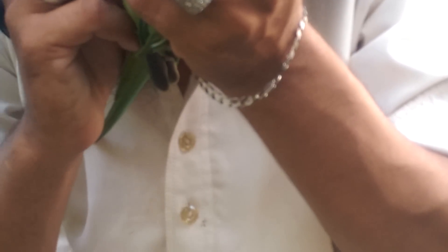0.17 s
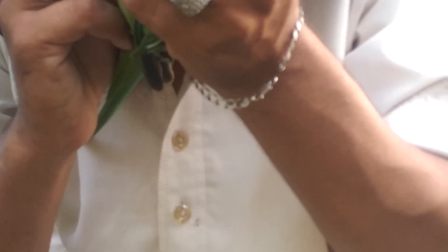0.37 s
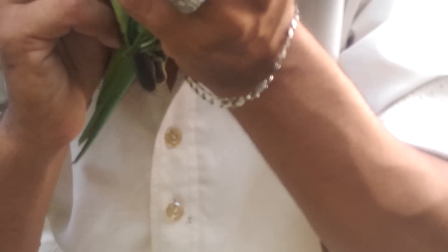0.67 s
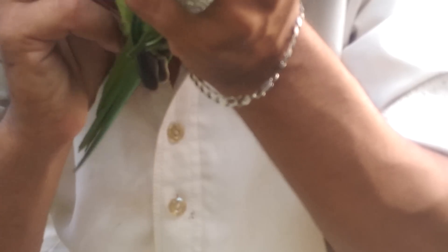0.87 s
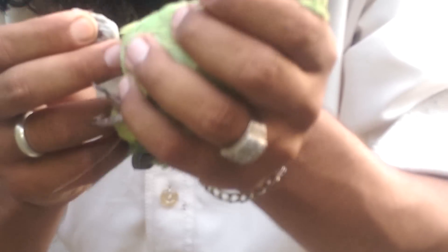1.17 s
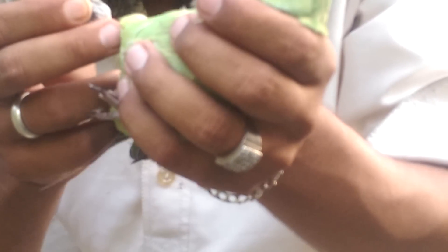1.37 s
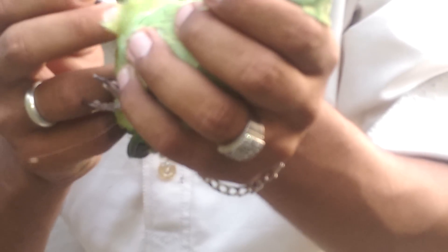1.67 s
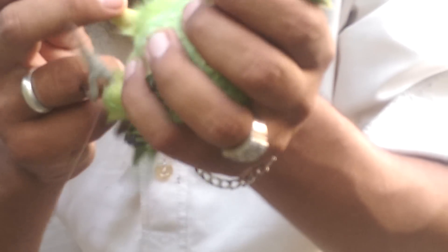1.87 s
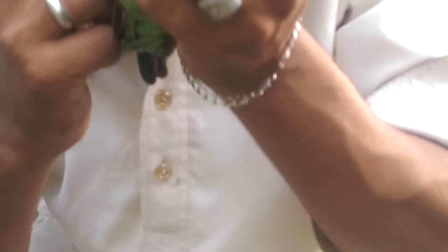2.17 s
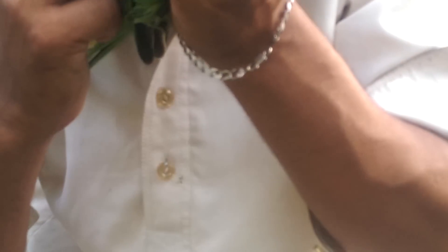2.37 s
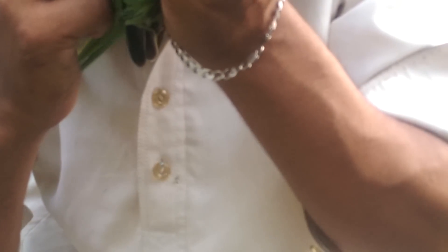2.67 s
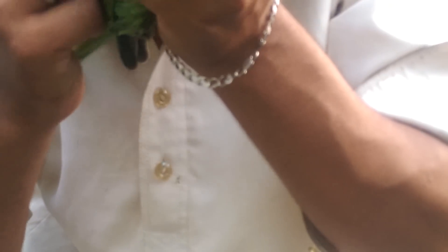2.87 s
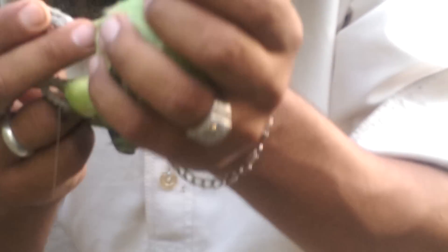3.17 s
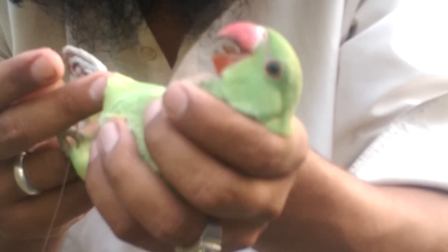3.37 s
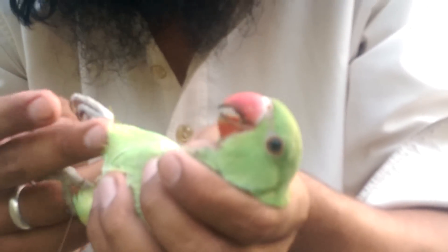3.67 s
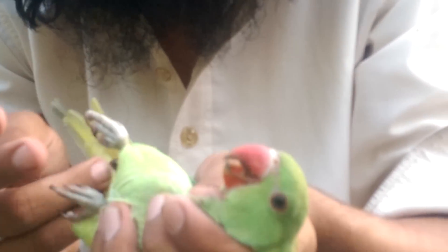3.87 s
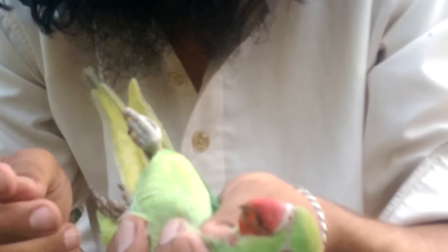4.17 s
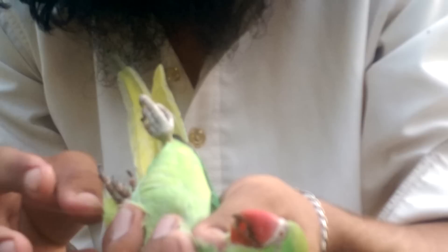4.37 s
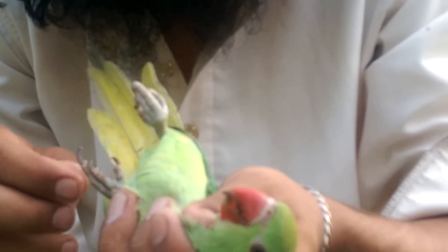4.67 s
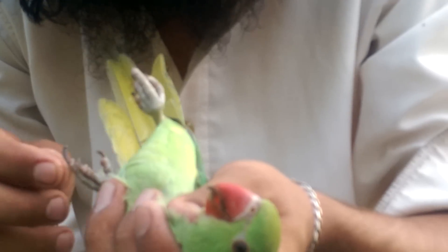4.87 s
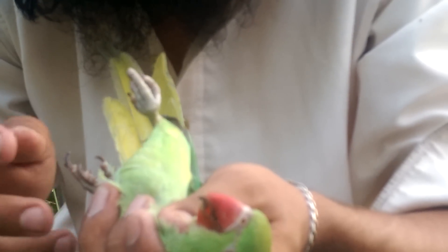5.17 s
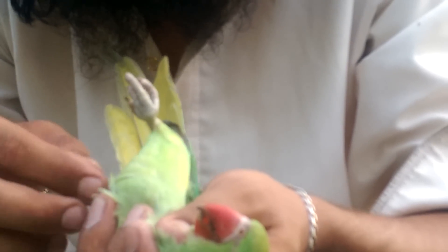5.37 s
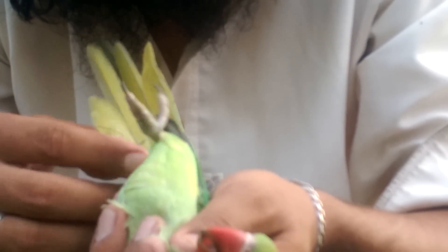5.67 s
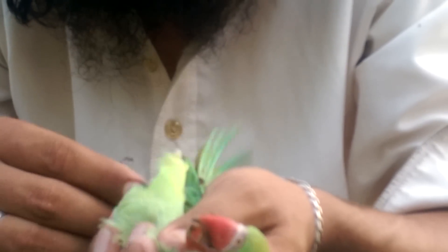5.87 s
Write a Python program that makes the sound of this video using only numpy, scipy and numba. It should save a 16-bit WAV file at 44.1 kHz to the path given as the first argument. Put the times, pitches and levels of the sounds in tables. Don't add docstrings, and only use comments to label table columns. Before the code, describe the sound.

Outdoors, close stereo phone pickup. A parakeet gives a run of loud, rough, nasal screeches with a fast rattling flutter and sharp starts and stops, drawing small hissy gasps between them. It falls silent for over two seconds, leaving steady airy hush, a low rumble, high cricket shimmer and tiny distant bird notes. Feathers brush fingers once, then a final bright squawk rises and runs into the end.

```python
import sys
import numpy as np
from scipy import signal
from scipy.fft import rfft, irfft
from scipy.io import wavfile
from scipy.ndimage import uniform_filter1d, map_coordinates
from numba import njit

SR = 44100
rng = np.random.default_rng(int(sys.argv[2]) if len(sys.argv) > 2 else 0)


def generate_wav(signal):
    frames = np.transpose(np.atleast_2d(signal))
    scaled = np.clip(frames, -1, 1) * 32767
    pcm = np.round(scaled).astype(np.int16)
    wavfile.write(sys.argv[1], SR, pcm)


def linear_from_db(decibels):
    return 10 ** (np.asarray(decibels, float) / 20)


N = 265570
TIME = np.arange(N) / SR


def unit(x):
    return x / np.sqrt(np.mean(x ** 2))


def curves(table):
    columns = np.array(table).T
    return [np.interp(TIME, columns[0], column) for column in columns[1:]]


def walk(rate):
    hold = int(SR / rate)
    steps = np.repeat(rng.standard_normal(N // hold + 1), hold)
    return 1.3 * uniform_filter1d(uniform_filter1d(steps, hold), hold)[:N]


@njit
def svf(x, hz, width):
    y, band, low = np.empty(len(x)), 0., 0.
    for i in range(len(x)):
        g, k = np.tan(np.pi * hz[i] / SR), width / hz[i]
        v = (band + g * (x[i] - low)) / (1 + g * (g + k))
        band, low, y[i] = 2 * v - band, low + 2 * g * v, k * v
    return y


def ring(x, hz, width, second_width):
    centre = hz * np.ones(N)
    return svf(svf(x, centre, 1. * width), centre, 1. * second_width)


def coloured(points, likeness=None):
    log_hz = np.log(np.fft.rfftfreq(N, 1 / SR) + 1)

    def read(table):
        hz, value = np.array(table).T
        return np.interp(log_hz, np.log(hz), value)

    alike = np.clip(read(likeness), -.99, .99) if likeness else 0.5
    mid, side = rfft(rng.standard_normal((2, N))) * linear_from_db(read(points))
    side = side * np.sqrt((1 - alike) / (1 + alike))
    return irfft(np.array([mid + side, mid - side]), N)


def glide(s, length, start_hz, end_hz, db):
    u = np.clip((TIME - s) / length, 0, 1)
    cycles = length * u * (start_hz + (end_hz - start_hz) * u / 2)
    return linear_from_db(db) * np.sin(np.pi * u) * np.sin(2 * np.pi * cycles)


@njit
def beats(hz, stretch, size, weak, restart):
    out, phase, strong = np.zeros(len(hz) + 1), 0., True
    for i in range(len(hz)):
        step = 2 * hz[i] * (1 + stretch[i]) / SR
        phase += step
        if restart[i]:
            phase, strong = 1., True
        if phase >= 1:
            phase -= 1
            a = size[i] * (1. if strong else weak[i])
            out[i] += a * phase / step
            out[i + 1] += a * (1 - phase / step)
            strong = not strong
    return out[:-1]


def airway(choke, count):
    count = count + .022 * walk(90)
    burst = np.floor(count).astype(int)
    phase = count - burst
    chance = rng.standard_normal((600, 3))[burst % 600].T
    open_share = (.32 + .8 * (1 - choke)) * linear_from_db(.7 * chance[0])
    shut = 1 / (1 + np.exp(-(phase - np.minimum(open_share, .8)) / .11))
    depth = np.clip(choke + 2 * choke * (1 - choke) ** 1.3 * chance[1], 0, .98)
    burst_db = 1.4 * choke * chance[2]
    flow = uniform_filter1d((1 - depth * shut) * linear_from_db(burst_db), size=9)
    flow = flow / np.sqrt(uniform_filter1d(flow ** 2, size=2600))
    reopened = np.r_[False, np.diff(burst) > 0] & (depth > .6)
    detune, narrowing = .1 * chance[1], choke ** 3 * (phase - .2)
    return flow, reopened, detune, narrowing


# t/s, extra path/s, share
ECHO = [(.1, 0.00051, 0.27), (.7, 0.0034, 0.047), (.9, 0.00085, 0.21), (1.45, 0.0016, 0.19),
        (2.1, 0.0011, 0.13), (2.55, 0.0017, 0.043), (2.9, .001, 0.17), (3.25, 0.0015, 0.29),
        (3.381, 0.0016, 0.37), (5.831, 0.0014, .2)]


def chest(x):
    lag, share = curves(ECHO)
    dull = signal.sosfilt(signal.butter(2, 7500, fs=SR, output="sos"), x)
    return x + share * map_coordinates(dull, [np.arange(N) - lag * SR], order=3)


# t/s, windpipe pitch f/Hz, choke 0-1, airway closures per s
SYRINX = [(.1, 980, .95, 94), (.17, 930, .75, 90), (.24, 860, .68, 80), (.34, 810, .35, 72),
          (.38, 835, .78, 101), (.52, 860, .84, 99), (.57, 960, .94, 97.5), (.7, 960, .94, 99),
          (.9, 975, .95, 92), (1.08, 990, .95, 99.5), (1.2, 1090, .93, 110.3), (1.44, 1070, .93, 107),
          (1.6, 1040, .96, 90.5), (1.83, 1095, .94, 100), (1.91, 1170, .86, 110), (2.09, 1090, .9, 112),
          (2.25, 1030, .94, 97), (2.36, 1040, .92, 91.5), (2.5, 1000, .87, 76.5), (2.55, 980, .85, 105),
          (2.9, 975, .96, 97.5), (3.1, 955, .9, 104.5), (3.23, 1020, .84, 102.5), (3.33, 1030, .82, 94),
          (3.36, 1000, .55, 96), (5.875, 1070, .97, 118.5), (5.9, 1080, .62, 120), (6.03, 1050, .62, 121.5)]


def syrinx(call, onset, rough, slack):
    pipe_hz, choke, closures = curves(SYRINX)
    weak = .1 + .45 * np.clip((1090 - pipe_hz) / 280, 0, 1) ** 1.5
    hz = pipe_hz * (1 - .55 * np.clip(slack, 0, 1))
    counted = np.cumsum(closures) / SR
    count = counted - np.interp(onset, TIME, counted) + 100 * call
    flow, reopened, detune, narrowing = airway(choke, count)
    wobble = rough * (detune + .46 * choke * walk(1500))
    wobble = wobble - .15 * narrowing - .055 * np.clip(8 * choke - 6.6, 0, 1)
    size = linear_from_db(2.7 * rng.standard_normal(N) * rough * 3)
    pulses = beats(hz, wobble, size, weak, reopened)
    breath = .45 * rough * rng.standard_normal(N)
    return (unit(pulses - pulses.mean()) + breath) * flow, pipe_hz, hz


# f/windpipe pitch, width/Hz, left/dB, right/dB
PIPE = [(.67, 170, -5.5, -10.5), (1.02, 150, 2.5, -6), (1.62, 332, 3, -2.5), (1.96, 337, 0, -6.5)]
# f/Hz, width/Hz, left/dB, right/dB
THROAT = [(2686, 208, 2.5, -6.5), (3048, 293, 5, -34.5), (3577, 1120, 1.5, -12)]
# f/beak resonance, width/Hz, left/dB, right/dB
BEAK = [(.97, 500, 7, -4), (1.14, 500, 2.5, -4.5), (1.29, 700, -4.5, -25)]
# f/Hz, width/Hz, left/dB, right/dB
TOP = [(8185, 980, 5, -1.5), (9470, 1100, -1.5, -27.5), (10360, 490, 4.5, -0.5), (11770, 3100, -10.5, -28),
       (15000, 1800, -16.5, -17)]
# f/Hz, width/Hz, left/dB, right/dB
HEAD = [(682.6, 47, -5, -8), (1123, 150, -21.5, -16), (2285, 220, 2.5, -6.5), (440, 147, -13, -19)]
HEAD_DB = (-8, -6, -6.5, -9.5, -7, -16)
SHEEN_DB = (1, -2, -6, 5.5, 5, -9.5)
# side tone/dB, low throat/dB, whole throat/dB, beak rim/dB, top/dB
POSTURE = [(-9, 10, -1, -2, -9), (5, 4.5, 0, 2, -8.5), (6.5, 0.5, 2, 2.5, -9), (1, 5.5, 3.5, 14.5, -7),
           (2.2, 5, 5.5, 0.5, -9.5), (4, -1, 8, 13, -1.5)]
# lag/s of windpipe, throat, beak, top, head
PORT_LAG_S = (0.00018, 0.00024, 0.000316, 0.0002486, 0.00011)
LAG_SCALE = (0.865, 1.036, 0.998, 1.01, 1.005, 0.91)


def resonances(source, call, pipe_hz, beak_hz, gape_db):
    side_db, low_db, throat_db, rim_db, top_db = np.array(POSTURE)[call].T
    sheen_db, head_db = np.array(SHEEN_DB)[call], np.array(HEAD_DB)[call]
    lag_scale = np.array(LAG_SCALE)[call]
    drift = .000012 * (walk(13) + walk(300))
    # modes, their scale, group dB, which mode the hand shades, by how many dB
    groups = ((PIPE, pipe_hz, 0, 2, side_db),
              (THROAT, 1, throat_db + .4 * gape_db, 0, low_db),
              (BEAK, beak_hz, gape_db, 2, rim_db),
              (TOP, 1, top_db + gape_db, 4, sheen_db),
              (HEAD, 1, head_db, 0, 0))
    out = np.zeros((2, N))
    for (modes, scale, band_db, shaded, shade_db), lag in zip(groups, PORT_LAG_S):
        band = np.zeros((2, N))
        for k, (f, width, left_db, right_db) in enumerate(modes):
            mode = ring(source, f * scale, 1.03 * width, 3. * width) * linear_from_db(shade_db * (k == shaded))
            band += (-1) ** k * linear_from_db([[left_db], [right_db]]) * mode
        place = np.arange(N) - (lag * lag_scale + drift) * SR
        band[1] = map_coordinates(band[1], [place], order=3)
        out += band / np.std(band) * linear_from_db(band_db)
    return out


# onset t/s, end t/s, beak resonance at onset f/Hz, at end f/Hz, roughness 0-1
SCREECHES = [(.0978, .698, 4850, 4830, .24), (.8975, 1.438, 4330, 4330, .18),
             (1.6057, 2.088, 4230, 4680, .17), (2.2449, 2.548, 4090, 4120, .19),
             (2.8991, 3.366, 4850, 4700, .3), (5.8382, 6.06, 4300, 4450, .37)]
# t/s, level/dB, gape/dB
EFFORT = [(.1, -32.5, -10), (.15, -33.5, -0.5), (.318, -33.5, -7.5), (.678, -29, 3.5), (.7, -32.5, 1),
          (.9, -34, 0.5), (1.044, -33.5, 3), (1.108, -28.5, 9.5), (1.17, -30, 9.5), (1.402, -29.5, 9.5),
          (1.436, -31, 11), (1.61, -28.5, 8), (1.676, -30.5, 9), (1.834, -32.5, 11), (1.904, -27, 6),
          (2.06, -30.5, 10), (2.086, -31, 14), (2.25, -29.5, 1), (2.366, -26, 1.5), (2.53, -29.5, -2),
          (2.55, -32.5, -7.5), (2.9, -38.5, -3.5), (2.94, -32.5, -0.5), (3.052, -29, 0.5),
          (3.166, -29, 2.5), (3.266, -29, 6), (3.36, -29, 6), (5.849, -31, 8), (5.857, -23, -3),
          (5.946, -31.5, 5.5)]


def parakeet():
    db, gape_db = curves(EFFORT)
    screeches = np.array(SCREECHES)
    call = np.clip(np.searchsorted(screeches[:, 0] - .05, TIME) - 1, 0, None)
    onset, end, first_hz, last_hz, rough = screeches[call].T
    db = db - 4502.5 * np.maximum(onset - TIME, 0) - 1498 * np.maximum(TIME - end, 0)
    db = db - 4.5 * np.exp(-np.maximum(TIME - onset, 0) / .018)
    beak_hz = first_hz + (last_hz - first_hz) * np.clip((TIME - onset) / (end - onset), 0, 1)
    slack_s = 0.0073
    slack = np.exp(-np.abs(TIME - onset) / slack_s)
    slack = slack + .8 * np.exp(-np.maximum(end - TIME, 0) / slack_s)
    source, pipe_hz, hz = syrinx(call, onset, rough, slack)
    out = resonances(-chest(source), call, pipe_hz, beak_hz, gape_db - 11.5 * slack)
    out = out + linear_from_db(-4.5) * slack ** 2 * np.sin(2 * np.pi * np.cumsum(hz) / SR)
    pan_db = 1.4 + slack
    return out * linear_from_db(db) * linear_from_db(np.array([pan_db - 5, 5 - pan_db]) / 2)


def room(x):
    t, t60_s = np.arange(int(.35 * SR)) / SR, .27
    tail = rng.standard_normal((2, len(t))) * linear_from_db(-60 * t / t60_s) * (t > .003)
    tail = tail / np.sqrt(np.sum(tail[0] ** 2))
    return linear_from_db(-23) * signal.fftconvolve(x, tail, axes=1)[:, :N]


# t/s, length/s, level/dB
GASPS = [
    (1.45, 0.45, -53.5),
    (2.099, 0.13, -57.5),
]


def gasps():
    swell = sum(linear_from_db(db) * np.sin(np.pi * np.clip((TIME - s) / length, 0, 1)) for s, length, db in GASPS)
    hiss = ring(rng.standard_normal(N), 3230, 7600, 7600)
    return swell * unit(hiss) * linear_from_db(np.array([[2.5], [-2.5]]) + 3.4 * walk(84))


# f/Hz, level/dB per Hz
RUSTLE_TONE = [(180, -39), (300, -2.5), (348, -16), (502, -5), (645, -14), (1170, -7.5), (2250, -13),
               (7570, -16.5), (16000, -27)]


def rustle():
    start_s, hold_s, fade_db_per_s = 3.794, .05, 125
    fade_db = fade_db_per_s * np.maximum(TIME - start_s - hold_s, 0)
    return unit(coloured(RUSTLE_TONE)) * (TIME > start_s) * linear_from_db(-49.5 - fade_db + 1.2 * walk(120))


def phrases(table, hz, length, fall):
    gap_s = .027
    return sum(glide(s + k * gap_s, length, (1 + fall) * hz, (1 - fall) * hz, db)
               for s, db, notes in table for k in range(round(notes)))


# t/s, peak level/dB, notes
CHIRPS = [(.0044, -50, 3), (2.5944, -53, 1), (2.8064, -55, 3), (3.709, -54, 3), (3.9414, -53.5, 3),
          (4.6229, -51.5, 3), (4.8837, -52, 2), (5.463, -52, 3)]
# t/s, peak level/dB, notes
TWITTER = [(3.5144, -59, 2), (3.6197, -58, 1), (4.1465, -58.5, 3), (4.6089, -55.5, 1), (4.6894, -59.5, 3),
           (5.274, -56, 1), (5.3228, -56, 1), (5.8155, -55, 1)]
# t/s, length/s, start f/Hz, end f/Hz, level/dB
HOOTS = [
    (1.75, .04, 270, 255, -53),
    (1.945, .06, 310, 240, -49),
    (3.855, .065, 285, 240, -47.5),
    (1.548, .025, 1050, 1000, -45),
    (2.13, .075, 2000, 2450, -44),
    (2.145, .055, 2350, 2100, -44),
    (2.212, .022, 1000, 1300, -47),
    (3.79, .03, 480, 470, -49),
    (3.572, .012, 4200, 3600, -55),
    (2.882, .005, 2400, 1600, -47),
]


def far_birds():
    notes = phrases(CHIRPS, 5480, 0.0111, 0.113) + phrases(TWITTER, 6240, 0.01, 0.035)
    notes = notes + linear_from_db(2.5 * walk(200)) * sum(glide(*row) for row in HOOTS)
    return np.array([np.roll(notes, shift=8), notes])


# f/Hz, width/Hz, level/dB, throb/dB
CRICKETS = [(7610, 860, -60.5, 0), (8000, 300, -72.5, 0.5), (9250, 596, -75, -2), (4600, 500, -72.5, 1),
            (5700, 750, -69, 4)]


def crickets():
    out = np.zeros((2, N))
    for hz, width, db, throb_db in CRICKETS:
        throb = linear_from_db(db + throb_db * np.tanh(walk(45)) + 1.1 * walk(2.7))
        for side in out:
            side += throb * unit(ring(rng.standard_normal(N), hz, 0.98 * width, 0.98 * width))
    return out


# f/Hz, level/dB per Hz
AIR = [(12, -47), (20, 1), (88, -9), (134, -4.5), (446, -20), (698, -20.5), (1440, -25), (1710, -20.5),
       (3630, -31), (5680, -27.5), (6540, -39.5), (7730, -22), (10200, -37), (14300, -38), (16000, -50)]
# f/Hz, left-right likeness
LIKENESS = [(60, .93), (130, .86), (290, .85), (640, .2), (1410, -.5), (3100, -.13), (6820, -.21),
            (15000, -.31)]


def open_air():
    return unit(coloured(AIR, LIKENESS)) * linear_from_db(-59 + .7 * walk(3))


def rumble():
    drone = svf(rng.standard_normal(N), 60.5 * np.ones(N), 26.)
    return linear_from_db(-62.5 + 0.68 * walk(1.8)) * unit(drone)


def scene():
    bird = parakeet()
    near = bird + room(bird) + gasps() + rustle()
    return near + far_birds() + crickets() + open_air() + rumble()


def band_limit(x):
    return signal.sosfilt(signal.butter(12, 16480, fs=SR, output="sos"), x)


def record(dry):
    dry = signal.sosfilt(signal.butter(3, 48, "high", fs=SR, output="sos"), dry)
    dry = signal.sosfilt(signal.ellip(8, .3, 50, 15500, fs=SR, output="sos"), dry)
    mix = np.tanh(0.9 * dry) / 0.7
    return band_limit(mix)


dry = scene()
out = record(dry)
generate_wav(out)
```